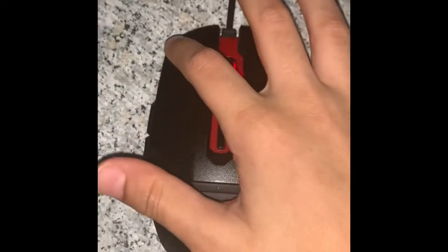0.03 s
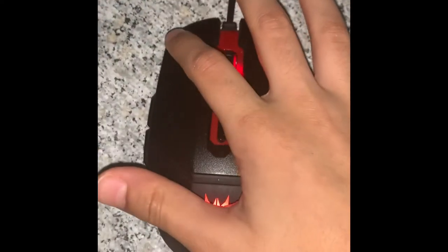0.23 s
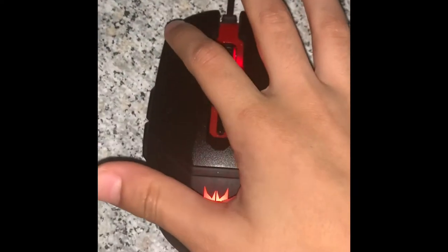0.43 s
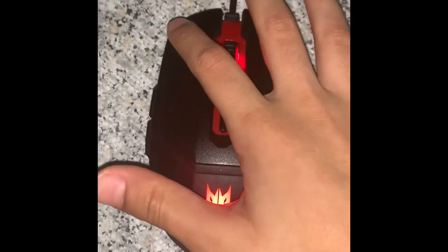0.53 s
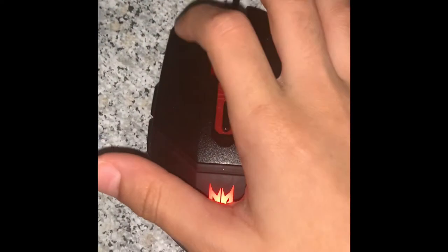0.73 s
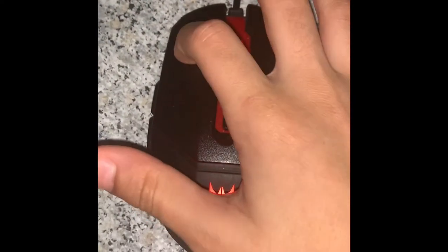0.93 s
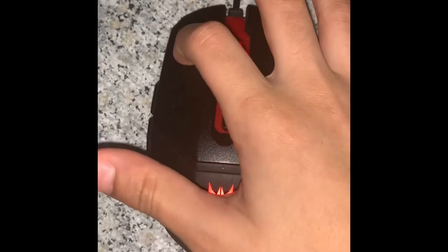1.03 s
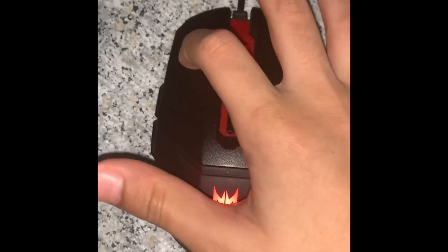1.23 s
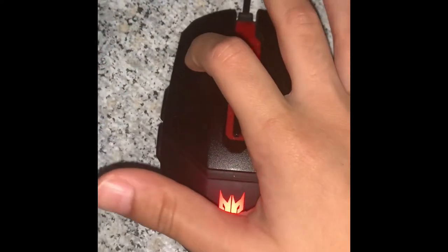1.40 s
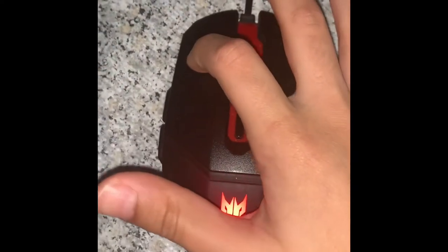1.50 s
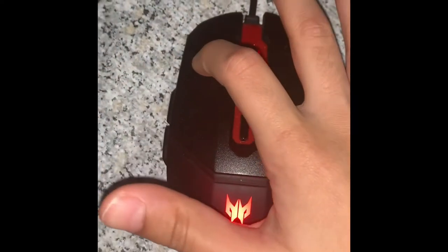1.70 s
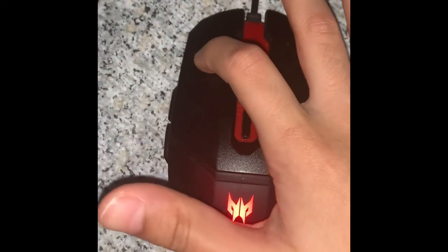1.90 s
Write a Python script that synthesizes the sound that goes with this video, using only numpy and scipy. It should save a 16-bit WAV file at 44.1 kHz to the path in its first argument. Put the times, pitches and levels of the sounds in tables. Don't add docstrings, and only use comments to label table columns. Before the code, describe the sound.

Computer mouse buttons clicking sharply: three quick clicks, a pause, then a steady run of ten

```python
import sys
import numpy as np
from scipy import signal
from scipy.fft import rfft, irfft
from scipy.io import wavfile
from scipy.ndimage import uniform_filter1d

SR = 44100
rng = np.random.default_rng(int(sys.argv[2]) if len(sys.argv) > 2 else 0)


def elevation(decibels):
    levels = np.asarray(decibels, float)
    return 10 ** (levels / 20)


def wrap_up_sound(samples):
    columns = np.atleast_2d(samples).T
    tamed = np.clip(columns, -1, 1)
    steps = np.round(tamed * 32767).astype(np.int16)
    wavfile.write(sys.argv[1], SR, steps)


N = 85995

# frequency in Hz, level in dB, decay time t60 in seconds.
FIRST_SWITCH = [(3540, -16.5, 0.018), (4670, -54.5, .012), (5720, -14.5, 0.023), (7374, 12, 0.0048),
                (8490, 6.5, 0.0085), (7900, 4.5, 0.0058), (8800, -41, 0.023), (9650, 1.5, 0.013),
                (10790, -3.5, 0.007), (11610, 1, 0.0059), (12700, 0.5, 0.0032), (13400, -1.5, 0.021),
                (13700, -6.5, 0.0016), (15500, -8.5, .008)]
# frequency in Hz, level in dB, t60 in seconds.
RELEASE_SWITCH = [(2930, -15, 0.0017), (4700, 0, 0.017), (6080, -4.5, 0.0058), (6025, 7, 0.011),
                  (7490, 7, 0.0047), (8570, -2.5, 0.014), (9350, 2.5, 0.0066), (10590, -6, 0.0035),
                  (11620, 1, 0.0059), (14470, -9, 0.0031), (13060, 10.5, 0.0034), (12970, -15.5, 0.0021),
                  (14740, -15, 0.02), (14800, -6.5, 0.012)]
# time from the click in ms, level in dB.
FIRST_CONTACTS = [
    (-4, -32),
    (-2.5, -30),
    (-1, -27),
    (.8, 0),
    (1.4, -7),
    (2, -4),
    (2.6, -8),
    (3.4, -11),
    (4.6, -16),
    (6, -22),
]

SCATTER_DB = 1.5
SHELL_ROOM_DB = 0.5
ROOM_DAMP = 0.45


def level(x, db):
    return x * elevation(db) / np.sqrt(np.mean(x ** 2))


def ring(modes, scatter_db, size=3000):
    detune = 0.006
    t = np.arange(size) / SR
    hz, db, t60 = np.array(modes).T[:, :, None]
    gain_chance, pitch_chance = rng.standard_normal((len(modes), 2)).T[:, :, None]
    sign = (-1) ** np.arange(len(modes))[:, None]
    onset = 1 - np.exp(-2 * t * hz)
    decay = np.exp(-np.log(1000) * t / t60)
    sines = np.sin(2 * np.pi * hz * (1 + detune * pitch_chance) * t)
    y = (sign * elevation(db + scatter_db * gain_chance) * onset * decay * sines).sum(0)
    return y / np.sqrt(np.sum(elevation(2 * db)))


def add(x, y, s):
    i = int(s * SR) - 8
    taps = np.arange(-8, 9) - s * SR % 1
    kernel = np.sinc(taps) * np.cos(np.pi * taps / 18) ** 2
    y = np.convolve(y, kernel)[:N - i]
    x[i:i + len(y)] += y


def snap(x, s, db, bright_db, modes, contacts):
    # frequency in Hz, level in dB, t60 in seconds.
    housing = [(640, -0.5, 0.011), (820, 1, 0.014), (1073, -10, 0.018), (1414, -3, 0.012),
               (2124, -17.5, 0.039), (2512, -21, 0.049), (3120, -13, 0.029), (3706, -3.5, 0.018),
               (4280, 3, 0.026), (5230, 3, 0.015)]
    snap_db, housing_db, room_feed_db = -2, -22, -0.5
    rest_ms, rest_fade_ms, rest_db = 2.9, 0.8, -8
    leaf = [m for m in modes if 6500 < m[0] < 9000]
    struck = [(f, g + bright_db * np.log2(f / 7000), t60) for f, g, t60 in modes]
    blurred = [(f, g, ROOM_DAMP * t60) for f, g, t60 in modes]
    for ms, contact_db in contacts:
        at = s + ms * (1 + 0.0646 * rng.standard_normal()) / 1000
        settled = np.clip((np.arange(3000) / SR * 1000 + ms - rest_ms) / rest_fade_ms, 0, 1)
        gain = elevation(db + snap_db + contact_db + rest_db * (ms < rest_ms) * settled)
        add(x[0], gain * ring(struck if ms > 0 else leaf, SCATTER_DB), at)
        if ms > 0:
            crack = elevation(db + housing_db + contact_db) * ring(housing, SCATTER_DB)
            add(x[0], crack, at)
            add(x[1], crack, at)
    add(x[1], elevation(db + snap_db + room_feed_db) * ring(blurred, 1), s)


def knock(x, s, db):
    # frequency in Hz, level in dB, t60 in seconds.
    shell = [(621, -12.5, 0.018), (746, -13.5, 0.017), (947.6, 0, 0.022), (1106.5, -11.5, 0.06),
             (1473, -1.5, 0.03), (1953, -4.5, 0.015), (2270, -46, .015), (245, -17, 0.31)]
    late_ms, push_ms, knock_db = 3.333, 2.38, -0.5
    push = np.hanning(41) ** (9 / push_ms ** 2)
    thud = np.convolve(ring(shell, 2 * SCATTER_DB), push / push.sum())[:3000]
    for ms, part_db in ((0, 1.2), (1.1, 6.8)):
        for row, feed_db in zip(x, (0, SHELL_ROOM_DB)):
            add(row, elevation(db + knock_db + part_db + feed_db) * thud, s + (late_ms + ms) / 1000)


def button(clicks, modes, contacts):
    x = np.zeros((2, N))
    for s, snap_db, knock_db, bright_db in clicks:
        snap(x, s, snap_db, bright_db, modes, contacts)
        knock(x, s, knock_db)
    return x


def first_button():
    # time in seconds, snap in dB, shell knock in dB, brightness in dB per octave.
    clicks = [
        (0.064, -17.5, -49, -1),
        (0.1531, -19.5, -36.5, -7),
        (0.2578, -17, -61, -1.5),
    ]
    return button(clicks, FIRST_SWITCH, FIRST_CONTACTS)


def second_button_down():
    # time in seconds, snap in dB, shell knock in dB, brightness in dB per octave.
    presses = [
        (0.8768, -21.5, -37, 0.5),
        (1.0786, -18.5, -35, 0.46),
        (1.2525, -18, -33, 0.8),
        (1.4108, -18.5, -40.5, 0.84),
        (1.559, -17, -31.5, 0.26),
    ]
    # frequency in Hz, level in dB, t60 in seconds.
    switch = [(2060, -37, 0.0054), (3480, -24, 0.01), (5870, -13, 0.02), (6970, 5, 0.0012),
              (7200, -4, 0.012), (8110, -9.5, 0.0091), (7800, -36, 0.0045), (8870, -4, 0.0021),
              (11550, -21, 0.0098), (11700, -15.5, 0.0043), (13000, -9.5, 0.0043), (14440, -21.5, 0.012),
              (14500, -8, 0.0072), (15200, -15, 0.0044)]
    # time from the click in ms, level in dB.
    contacts = [
        (-4.5, -30),
        (-2.5, -29),
        (-1, -27),
        (1.2, 0),
        (1.7, -5),
        (2.3, -4),
        (2.9, -7),
        (3.8, -12),
        (5, -12),
        (6.4, -18),
    ]
    return button(presses, switch, contacts)


def second_button_up():
    # time in seconds, snap in dB, shell knock in dB, brightness in dB per octave.
    releases = [
        (0.9783, -20.5, -56.5, 0.43),
        (1.1609, -18, -49, 0.5),
        (1.3473, -19.5, -56, 1),
        (1.504, -19.5, -53, 0.28),
        (1.6652, -20, -55, 0.33),
    ]
    # time from the click in ms, level in dB.
    contacts = [
        (-5, -33),
        (-3, -29),
        (-1.2, -27),
        (.7, 0),
        (1.5, -3),
        (2.1, -7),
        (2.8, -7),
        (3.8, -8),
        (5, -15),
        (6.3, -17),
    ]
    return button(releases, RELEASE_SWITCH, contacts)


def nail_ticks():
    # time in seconds, snap in dB, shell knock in dB, tap in dB.
    ticks = [
        (0.48, -41, -64, -43.5),
        (0.707, -48.5, -72, -49.5),
        (1.851, -66, -100, -57.5),
        (0.88, -73, -85, -54),
    ]
    # frequency in Hz, level in dB, t60 in seconds.
    edge = [(4300, -12, 0.011), (6400, -7, 0.01), (7100, 5, 0.0034), (8800, 4, 0.0029),
            (10100, -34, 0.0022), (10900, -21, 0.0037), (12100, -20, .004)]
    # frequency in Hz, level in dB, t60 in seconds.
    tapped = [(1007, 2.5, 0.036), (1550, -5, 0.045), (1740, -7.5, 0.012), (3310, -8.5, 0.036)]
    x = button([(s, db, knock_db, 0) for s, db, knock_db, _ in ticks], edge, [(0.1, 5), (0.8, -2)])
    for s, _, _, tap_db in ticks:
        add(x[0], elevation(tap_db) * ring(tapped, SCATTER_DB), s)
    return x


def scuffs():
    # start in seconds, length in seconds, shell level in dB, rattle level in dB.
    rubs = [
        (0.448, 0.026, -79, -102),
        (0.472, 0.0076, -64, -73.5),
        (0.478, 0.0027, -44, -57.5),
        (0.48, 0.0132, -50.5, -68),
        (0.698, 0.0042, -68.5, -74),
        (0.703, 0.0074, -64, -66),
        (1.198, 0.01, -75, -86),
        (1.8487, 0.0074, -89.5, -73.5),
    ]
    # frequency in Hz, level in dB, t60 in seconds.
    rubbed = [(500, -10, .012), (640, -5, .012), (750, -3, .012), (830, -1, .014), (955, -1, .014),
              (1040, -4, .012), (1250, -9, .01), (1555, 0, .012), (1875, 0, .014), (2140, -8, .01),
              (3500, -16, .01)]
    slips_per_s, fade_nepers = 5000, 0.26
    loose = [(f, 0.163 * db - 9.0 * np.log2(f / 7000), ROOM_DAMP * t60) for f, db, t60 in RELEASE_SWITCH[:-1]]
    x, t = np.zeros((2, N)), np.arange(N) / SR
    slips = (rng.random((2, N)) < slips_per_s / SR) * rng.standard_normal((2, N))
    to_phone_and_room = np.array([[0], [SHELL_ROOM_DB]])
    for s, length, shell_db, rattle_db in rubs:
        u = (t - s) / length
        env = np.clip(u * length * 700, 0, 1) * np.clip((1 - u) * length * 500, 0, 1)
        env = env * np.exp(-fade_nepers * np.clip(u, 0, 1))
        rub = signal.fftconvolve(slips[0] * env, ring(rubbed, SCATTER_DB))[:N]
        rattle = signal.fftconvolve(slips[1] * env, ring(loose, SCATTER_DB))[:N]
        x += elevation(shell_db + 8 + to_phone_and_room) * rub + elevation(rattle_db + 20.5) * rattle
    return x


def desk_thump():
    x = np.zeros((2, N))
    hz, db, t60_s = 57, -25.5, 0.34
    add(x[0], elevation(db) * ring([(hz, 0, t60_s)], 0, size=14000), 0.74)
    return x


def direct_path(sound):
    # frequency in Hz, phase by which left leads in radians, left over right in dB.
    ports = [(1000, -.6, -1), (1900, -1.2, -4), (3000, 1.3, -4), (5250, 3.7, 2), (6630, 5.9, 0),
             (9820, 9.5, 0), (13000, 13.3, 0), (15400, 16.3, 0)]
    # frequency in Hz, gain in dB.
    mic = [(150, -21.5), (300, 1), (14000, 6), (14800, 3), (15800, 1), (16600, -27), (18000, -67.5)]
    hz = np.arange(N // 2 + 1) * SR / N
    f, turn, db = np.array([(0, 0, 0.0024)] + ports).T
    left = elevation(np.interp(hz, f, db) / 2)
    right = np.exp(-1j * np.interp(hz, f, turn)) / left
    return irfft(rfft(sound) * elevation(np.interp(hz, *np.array(mic).T)) * np.array([left, right]), N)


def room(x):
    start_ms, t60_s, tail_db = 3.5, 0.37, -12
    echo_ms, spread_ms, echo_db = 13.5, 2, -11.5
    low_hz, low_t60_s = 1800, 0.22
    ms = np.arange(SR // 2) / SR * 1000
    tail = np.clip(ms / start_ms - 1, 0, 1) * np.exp(-np.log(1000) * ms / 1000 / t60_s)
    echo = np.exp(-((ms - echo_ms) / spread_ms) ** 2)
    env = level(tail, tail_db) + level(echo, echo_db)
    answer = env * rng.standard_normal((2, len(ms))) / np.sqrt(len(ms))
    low = signal.sosfiltfilt(signal.butter(2, low_hz, fs=SR, output="sos"), answer)
    answer = answer - low * (1 - elevation(-60 * ms / 1000 * (1 / low_t60_s - 1 / t60_s)))
    return signal.fftconvolve(x[None], answer, axes=1)


def reverberation(to_room):
    earlier_s, earlier_db = 0.054, -19.5
    earlier = button([(0.01, earlier_db, earlier_db - 12, 0)], FIRST_SWITCH, FIRST_CONTACTS)[1]
    lead = int(earlier_s * SR)
    return room(np.pad(to_room, (lead, 0)) + np.pad(earlier, (0, lead)))[:, lead:lead + N]


def colour(shape, size):
    hz = np.arange(N // 2 + 1) * SR / N + 1
    f, db = np.array(shape).T
    gain = elevation(np.interp(np.log(hz), np.log(f), db, left=-60, right=-90))
    return irfft(rfft(rng.standard_normal((size, N))) * gain, N)


def hiss():
    # frequency in Hz, level in dB per Hz.
    spectrum = [(400, -1), (750, -7), (1150, 0), (2500, -0.5), (5000, -13), (9400, -12), (14200, -12),
                (15100, -25)]
    return level(colour(spectrum, size=2), -78.5)


def diffuse_field(x):
    # frequency in Hz, phase by which left leads in radians, likeness from 0 to 1.
    coherence = [(450, 0, .7), (1100, 2.9, .4), (2200, 3, .9), (3000, 3, .96), (3700, 2.1, .6),
                 (4300, 2.9, .97), (5150, 3.35, .98), (6600, 6.15, .99), (7400, 6.45, .99),
                 (9100, 9.25, .995), (10400, 9.6, .995), (11800, 12.4, .995), (13000, 12.75, .995),
                 (14300, 15.55, .995), (15600, 15.8, .995)]
    top_hz = 15600
    hz = np.arange(N // 2 + 1) * SR / N
    a, b = rfft(x) / np.sqrt(1 + (hz / top_hz) ** 80)
    f, turn, alike = np.array(coherence).T
    alike, turn = np.interp(hz, f, alike), np.interp(hz, f, turn)
    right = (alike * a + np.sqrt(1 - alike ** 2) * b) * np.exp(-1j * turn)
    return irfft(np.array([a, right]), N)


def mains_hum():
    # frequency in Hz, rms level in dB.
    partials = [(120, -53), (240, -69.5), (350, -76)]
    pan_db, wobble_db, lead_rad = 1.6, 1, 0.35
    t, lr = np.arange(N) / SR, np.array([[1], [-1]])
    drift = uniform_filter1d(uniform_filter1d(rng.standard_normal((3, N)), 2000), 2000)
    drift = level(drift, 0)
    hum = np.zeros((2, N))
    for k, (f, db) in enumerate(partials):
        phase = 2 * np.pi * f * t + k + lr * lead_rad / 2 + 0.09 * drift[k - 1]
        hum += np.sqrt(2) * elevation(db + wobble_db * (k + 0.5) * drift[k]) * np.sin(phase)
    return hum * elevation(lr * pan_db / 2)


def rumble():
    # frequency in Hz, level in dB per Hz.
    spectrum = [(20, -23), (40, -3.5), (100, -5), (220, -16), (260, -19.5), (400, -26.5), (500, -39),
                (700, -62.5)]
    side_db, tilt_db = -14, 7
    wide = [(f, db + side_db + tilt_db * np.log2(f / 60)) for f, db in spectrum]
    mid, side = colour(spectrum, size=1)[0], colour(wide, size=1)[0]
    return (mid + np.array([[1], [-1]]) * side) * elevation(-61.5) / mid.std()


def scene():
    mouse = first_button() + second_button_down() + second_button_up()
    mouse += nail_ticks() + scuffs() + desk_thump()
    to_phone, to_room = mouse
    diffuse = diffuse_field(reverberation(to_room) + hiss())
    return direct_path(to_phone) + diffuse + mains_hum() + rumble()


def band_limit(x):
    return signal.sosfilt(signal.butter(12, 16800, fs=SR, output="sos"), x)


def record(dry):
    return band_limit(dry)


dry = scene()
out = record(dry)
wrap_up_sound(out)
```